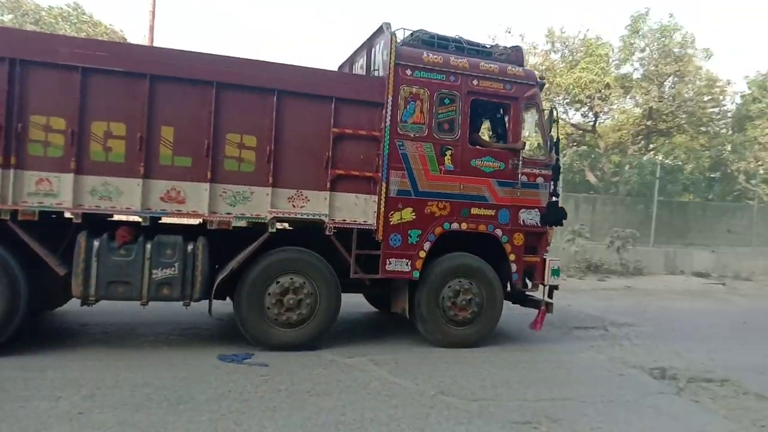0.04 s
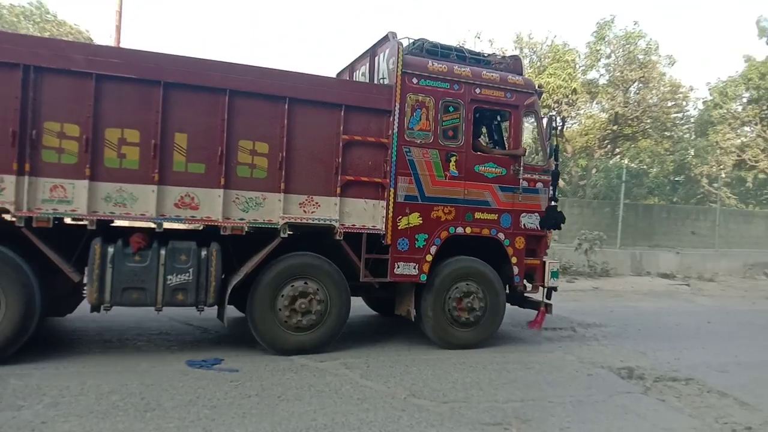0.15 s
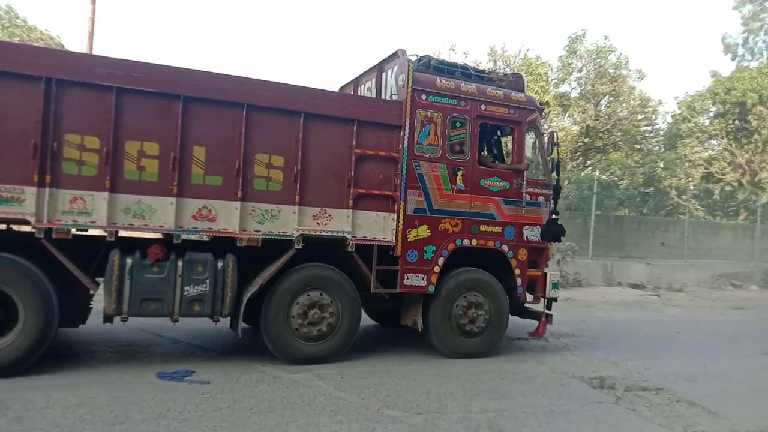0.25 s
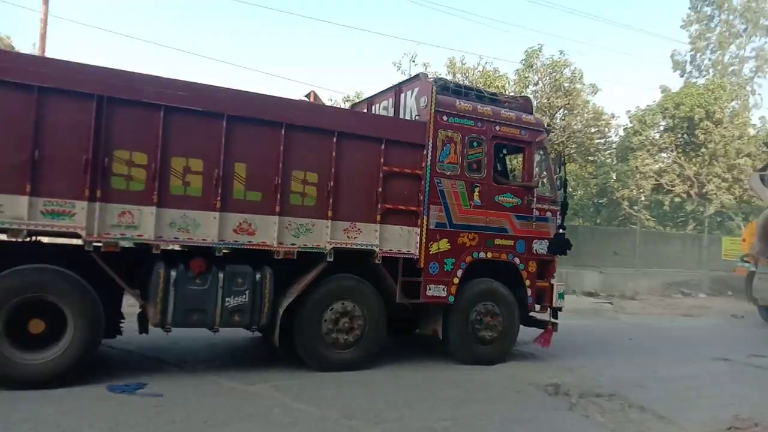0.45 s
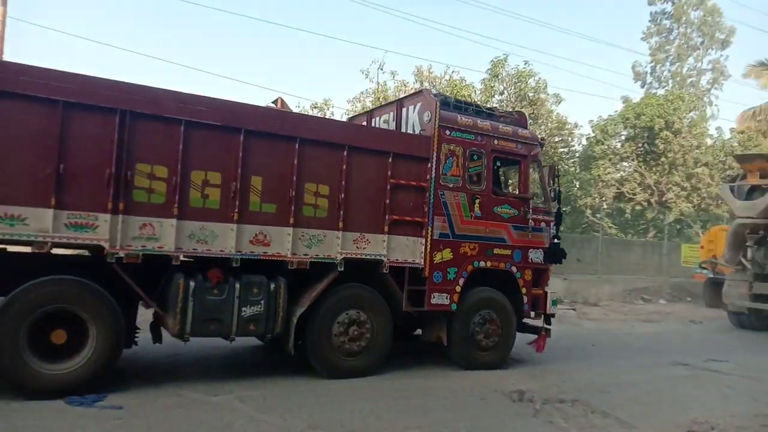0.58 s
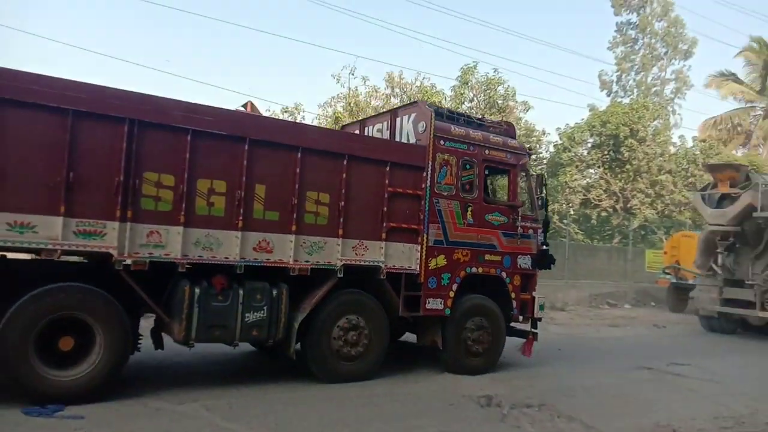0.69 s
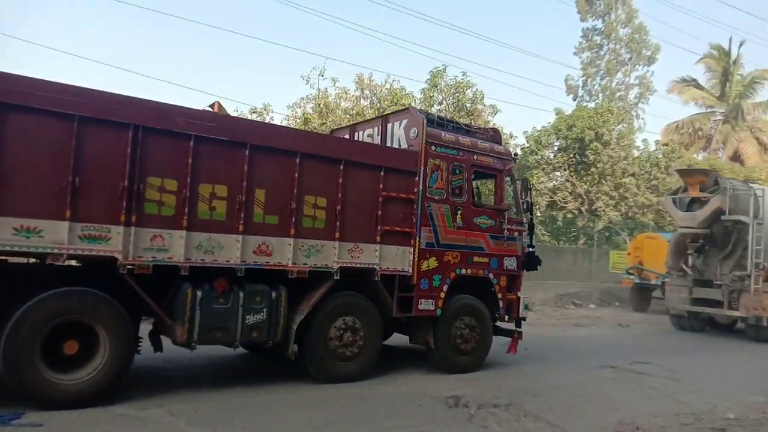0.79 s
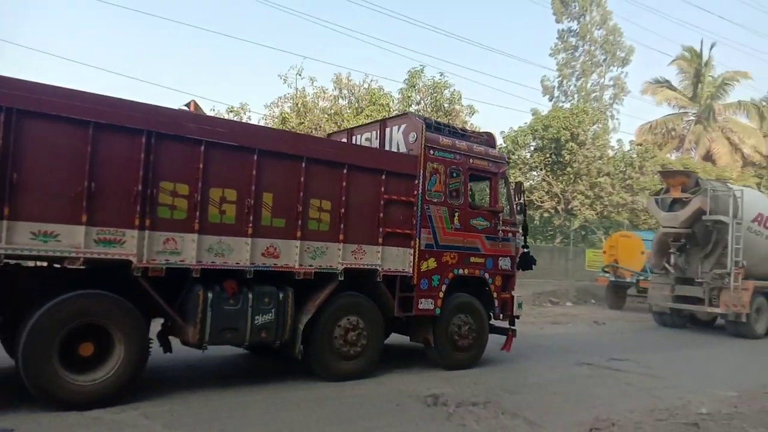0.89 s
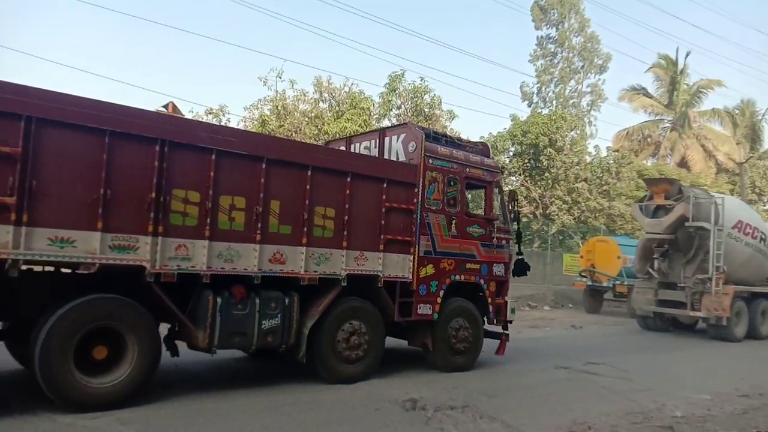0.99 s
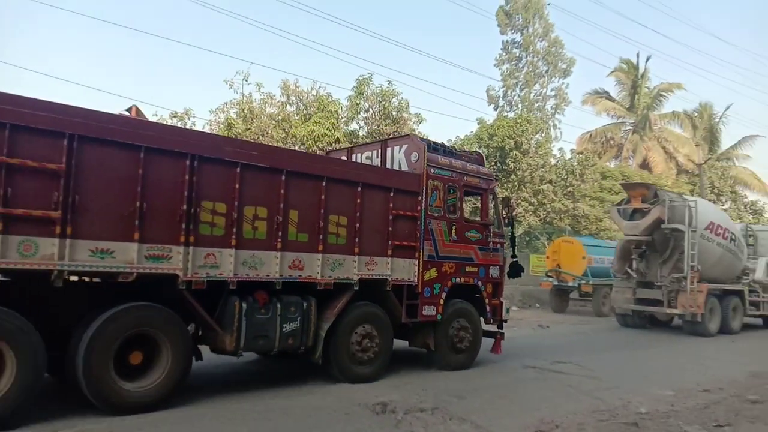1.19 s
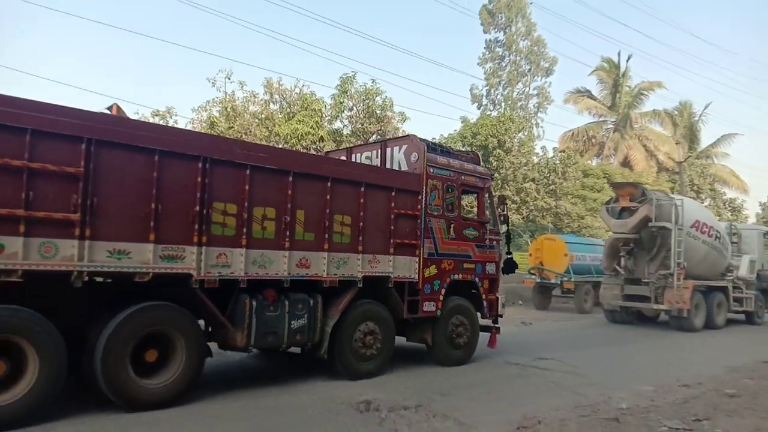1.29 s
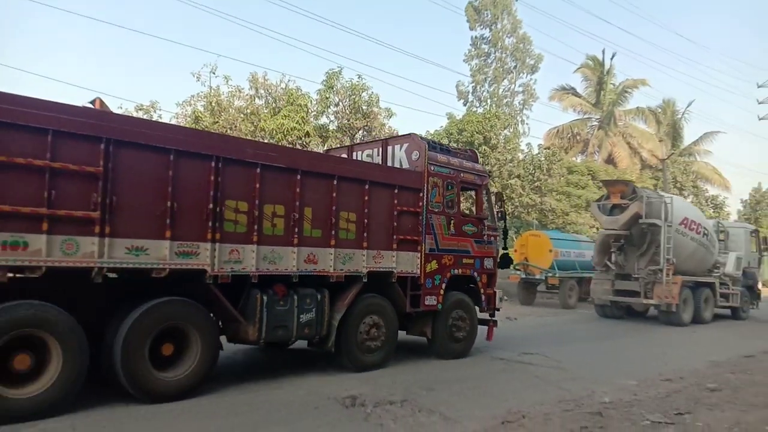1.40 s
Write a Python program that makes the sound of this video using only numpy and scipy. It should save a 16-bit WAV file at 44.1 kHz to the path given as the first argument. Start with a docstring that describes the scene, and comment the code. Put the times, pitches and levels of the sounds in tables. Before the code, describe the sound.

A high truck horn sounds one loud blast over continuous low engine drone and softer tyre noise. First the chassis rattles lightly and gives one thin squeak at about 0.2 seconds. The horn enters near 0.5 seconds with a hiss of air, holds until 0.8, then sags slightly in pitch and dies away by 1.2 with a faint street echo. The truck rolls on until about 1.5 seconds.

```python
"""Horn of a passing truck

A loaded tipper truck rolls past on an open road: broadband engine and tyre noise, and a low drone that
swells around the horn. The chassis rattles lightly in damped metal modes and squeaks once. Then a high
horn sounds one blast, a harmonic series over hissing air, its pitch sagging as it dies away.
The horn's overtones, the squeak and the rattles reverberate in the street."""
import sys
import numpy as np
from scipy import signal
from scipy.fft import rfft, irfft, next_fast_len
from scipy.io import wavfile
from scipy.ndimage import uniform_filter1d, map_coordinates

SR = 44100
rng = np.random.default_rng(int(sys.argv[2]) if len(sys.argv) > 2 else 0)


def wav_record(signal):
    """Record a signal, one row per channel, as 16-bit PCM in the file named by sys.argv[1]."""
    frames = np.transpose(np.atleast_2d(signal))
    bounded = np.clip(frames, -1, 1)
    # unit amplitude maps onto the largest positive 16-bit level
    quanta = np.round(bounded * 32767).astype(np.int16)
    wavfile.write(sys.argv[1], SR, quanta)


N = 63945


def amp(db):
    """Amplitude ratio of a level in decibels."""
    return 10 ** (np.asarray(db) / 20)


def unit(x):
    """Normalisation to rms 1."""
    return x / np.sqrt(np.mean(np.abs(x) ** 2) + 1e-20)


def clock():
    """Sample times in seconds."""
    return np.arange(N) / SR


def curve(rows):
    """Linear interpolation of (t, value) rows at every sample."""
    return np.interp(clock(), *np.transpose(rows))


def gate(start, end, edge):
    """Trapezoidal window: one from start to end, with ramps of edge seconds outside."""
    t = clock()
    return np.clip((t - start) / edge + 1, 0, 1) * np.clip((end - t) / edge + 1, 0, 1)


def wobble(rate):
    """Smooth random modulation: a spline through rate knots a second."""
    return map_coordinates(rng.standard_normal(4096), [clock() * rate + 2], mode="wrap")


def filtered(x, response):
    """Linear filtering: the spectrum of x times a frequency response."""
    size = next_fast_len(N + SR // 2)
    return irfft(rfft(x, size) * response(np.fft.rfftfreq(size, 1 / SR)), size)[:N]


def noise(spectrum):
    """Spectral shaping of white noise by (f, level) rows, at rms 1."""
    f, db = np.transpose(spectrum)
    white = rng.standard_normal(N)
    return unit(filtered(white, lambda hz: amp(np.interp(np.log(hz + 1), np.log(f), db))))


def patchy(x, depth_db=2):
    """Random modulation in time and frequency: drifting patches of higher and lower level."""
    spectra = signal.stft(x, nperseg=512)[2]
    field = uniform_filter1d(rng.standard_normal(spectra.shape), size=3, axis=0)
    field = uniform_filter1d(field, size=10, axis=1)
    return signal.istft(spectra * unit(amp(depth_db * unit(field))), nperseg=512)[1][:N]


def phase_of(hz):
    """Phase in radians as the time integral of frequency."""
    return 2 * np.pi * np.cumsum(hz) / SR


def tone(phase, flutter, rate):
    """Interference of a partial with randomly scattered copies makes it flutter; rms 1."""
    scatter = flutter * (wobble(rate) + 1j * wobble(rate))
    return unit(np.real((1 + scatter) * np.exp(1j * phase)) / np.sqrt(1 + 2 * flutter ** 2))


def street_echo(x, bass_t60_s=0.57):
    """Reverberation: diffuse reflections from walls and vehicles decay, the treble first."""
    hz, t, spectra = signal.stft(rng.standard_normal(SR), SR, nperseg=256)
    t60 = bass_t60_s / (1 + (hz / 7000) ** 2)
    tail = signal.istft(spectra * amp(-60 * t / t60[:, None]), SR, nperseg=256)[1]
    return signal.fftconvolve(x, tail / np.linalg.norm(tail))[:N]


# Spectra of the tyre roar and of its gritty treble: f/Hz, relative level/dB
ROAR_SPECTRUM = [(260, -35), (450, -6.5), (712, -8), (889, -4.5), (1160, -1), (1250, 2.5), (1430, -7.5),
                 (1860, -15.5), (2040, -20.5), (2260, -22.5), (3000, -30), (4030, -36.5), (4740, -37),
                 (6660, -48.5), (15500, -53.5)]
GRIT_SPECTRUM = [(900, -24.5), (1300, 2), (2000, 7.5), (3000, -9.5), (4200, -15.5), (6500, -28.5),
                 (15000, -46)]
# Envelopes of the roar with the tread's sing, and of the grit: t/s, relative level/dB
ROAR_ENVELOPE = [(0.0, -47), (0.44, -48), (1.086, -46.5), (1.126, -53), (1.34, -47), (1.356, -48.5),
                 (1.432, -44.5), (1.45, -46.5)]
GRIT_ENVELOPE = [(0, -48.5), (.08, -56), (.25, -67.5), (.45, -65), (.62, -60.5), (1, -56.5), (1.24, -68.5),
                 (1.34, -53.5), (1.4, -56), (1.425, -42), (1.45, -53)]


def tyres(tread_hz=1238, half_width_hz=64):
    """Rolling noise: a broadband roar, a narrow band where the tread sings, and flickering grit."""
    white = rng.standard_normal(N)
    sing = unit(filtered(white, lambda hz: 1 / (1 + ((hz - tread_hz) / half_width_hz) ** 2)))
    roar = amp(curve(ROAR_ENVELOPE)) * (amp(2.5) * noise(ROAR_SPECTRUM) + amp(-1.5) * sing)
    grit = amp(curve(GRIT_ENVELOPE) + 1.2 * wobble(60)) * noise(GRIT_SPECTRUM)
    return patchy(roar + grit)


# Low drone of the engine: t/s, f/Hz, level/dB
DRONE_TRACK = [(.1, 225.7, -49), (.19, 239.7, -29), (.31, 237.9, -23), (.38, 237.8, -27.5),
               (.54, 240.2, -28), (.68, 238.7, -27.5), (.77, 245.1, -31), (.81, 244, -22),
               (.85, 236.9, -34.5), (1, 235, -29.5), (1.11, 233.5, -42.5), (1.2, 224.3, -37.5)]
# Spectrum of the engine rumble: f/Hz, relative level/dB
RUMBLE_SPECTRUM = [(22, -34), (32, -23.5), (41, -9), (53, -10), (75, 2), (110, 2), (170, 1), (215, 4),
                   (280, -2), (360, -11), (500, -13), (700, -40.5), (1500, -72.5)]
# Envelope of the firing tone: t/s, relative level/dB
FIRING_ENVELOPE = [(0, -38), (.3, -48), (.68, -42.5), (.8, -44.5), (.88, -54), (1.45, -50)]


def engine(firing_hz=42.05, recede_s=0.99, recede_db_per_s=4):
    """Periodic firing gives a deep tone under a wavering drone; the rumble falls as the truck recedes."""
    t = clock()
    times, drone_hz, drone_db = np.transpose(DRONE_TRACK)
    phase = phase_of(np.interp(t, times, drone_hz))
    drone = tone(phase, flutter=0.23, rate=54) + amp(-27) * tone(2 * phase, flutter=0.24, rate=26)
    drone *= amp(np.interp(t, times, drone_db)) * gate(0.212, 1.36, edge=0.084)
    rumble = amp(-33 - recede_db_per_s * np.maximum(t - recede_s, 0)) * noise(RUMBLE_SPECTRUM)
    firing = amp(curve(FIRING_ENVELOPE) - 2.5) * tone(2 * np.pi * firing_hz * t, flutter=0.35, rate=17)
    return drone + firing + rumble


# Whines of the running gear: start t/s, end t/s, f/Hz, level/dB
GEAR_WHINES = [(0, .2, 2733, -58.5), (0, .08, 4150, -67.5), (.2, .27, 2580, -65), (1.385, 1.45, 4114, -65),
               (1.421, 1.453, 1203, -38.5)]


def running_gear():
    """Deep random modulation spreads faint metallic whines into narrow bands of noise."""
    return sum(amp(db) * gate(start, end, edge=0.02) * tone(2 * np.pi * hz * clock(), flutter=4.5, rate=220)
               for start, end, hz, db in GEAR_WHINES)


# Taps of the chassis: t/s, relative level/dB
TAPS = [(.137, -54.5), (.160, -52.5), (.166, -58), (.195, -63.5), (1.325, -65), (1.42, -59)]
# Modes of the loose metal: f/Hz, relative level/dB, T60/s
METAL_MODES = [(2060, -2.5, .06), (2580, 6, .06), (3456, -7.5, .05), (3989, -4.5, 0.11), (7000, -12, .07),
               (9450, -27.5, .05)]
# Spectrum of a tap's crack: f/Hz, relative level/dB
CRACK_SPECTRUM = [(1000, -10), (3200, -1), (4500, -11.5), (6000, -15.5), (15000, -36.5)]


def chassis_rattles(crack_t60_s=0.03, rise_s=0.00033):
    """Impact excitation: each tap gives a short crack and exponentially damped modes of loose metal."""
    out = np.zeros(N)
    for onset, db in TAPS:
        age = np.maximum(clock() - onset, 0)
        ring = sum(amp(level - 60 * age / t60) * np.sin(2 * np.pi * hz * age + rng.uniform(0, 2 * np.pi))
                   for hz, level, t60 in METAL_MODES)
        crack = amp(5.5 - 60 * age / crack_t60_s) * noise(CRACK_SPECTRUM)
        out += amp(db) * (1 - np.exp(-age / rise_s)) * (ring + crack)
    return out


def chassis_squeak(peak_s=0.226, hz=6430, sag_hz_per_s=520, rise_db_per_s=1001, fade_db_per_s=105.5):
    """Exponential growth and decay of a thin, fluttering metal tone that sags a little in pitch."""
    age = clock() - peak_s
    phase = phase_of(hz - sag_hz_per_s * age)
    ring = tone(phase, flutter=0.4, rate=130) + amp(-24.5) * tone(2 * phase, flutter=0.5, rate=200)
    level_db = -47.5 + np.minimum(rise_db_per_s * age, -fade_db_per_s * age)
    return amp(level_db) * ring * gate(0, peak_s + 0.125, edge=0.036)


# Envelope of the horn's air hiss: t/s, level/dB
HISS_ENVELOPE = [(.46, -87), (.51, -66.5), (.58, -61), (.65, -51), (.77, -67.5), (.9, -71), (1.02, -98)]
# Spectrum of the hiss: f/Hz, relative level/dB
HISS_SPECTRUM = [(1000, -25.5), (2500, 0), (3200, -3.5), (4200, -2.5), (4900, -5), (5800, 0), (8500, -18),
                 (12000, -8), (14200, -1.5), (15200, 7.5), (15800, -12.5)]
# Weak side tones of the horn: start t/s, end t/s, start f/Hz, end f/Hz, level/dB
INHARMONIC_TONES = [(.57, .72, 1640, 1598, -55), (.6, .715, 2532, 2500, -44), (.59, .72, 3925, 3905, -68),
                    (.59, .65, 4415, 4405, -64), (.59, .69, 5825, 5795, -63)]


def horn_air():
    """Flow noise of escaping air; at the height of the blast the engine drone modulates the horn into faint
    side tones."""
    out = amp(curve(HISS_ENVELOPE)) * patchy(noise(HISS_SPECTRUM)) * gate(0.39, 1.1, edge=0.03)
    for start, end, start_hz, end_hz, db in INHARMONIC_TONES:
        phase = phase_of(np.interp(clock(), [start, end], [start_hz, end_hz]))
        out += amp(db) * gate(start, end, edge=0.04) * tone(phase, flutter=0.61, rate=64)
    return out


# Fundamental frequency of the horn: t/s, f/Hz
HORN_PITCH = [(0.48, 1372), (0.616, 1387), (0.832, 1376), (0.952, 1357), (1.04, 1363)]
# Envelopes of the fundamental and of its octave: t/s, level/dB
FUNDAMENTAL_ENVELOPE = [(0.43, -59), (0.476, -28.5), (0.5, -21), (0.546, -14.5), (0.576, -21), (0.61, -14),
                        (0.64, -22), (0.662, -16), (0.776, -15), (0.976, -32.5), (1.038, -31.5),
                        (1.06, -54), (1.084, -35), (1.116, -45), (1.174, -43), (1.206, -56), (1.22, -52)]
OCTAVE_ENVELOPE = [(0.45, -90.5), (0.468, -48), (0.514, -28), (0.546, -43.5), (0.57, -23), (0.584, -22),
                   (0.624, -39), (0.654, -21), (0.678, -50), (0.706, -26), (0.738, -37), (0.79, -24.5),
                   (0.854, -36.5), (0.89, -28.5), (0.946, -33.5), (0.976, -42), (1.138, -60), (1.156, -53),
                   (1.22, -68)]
# Brassy overtones at full blast: harmonic number, level/dB
UPPER_HARMONICS = [(3, -49), (4, -51), (5, -63.5), (6, -70.5), (7, -67.5), (8, -70), (9, -75), (10, -71),
                   (11, -51.5)]


def horn(jitter_hz=4.5, onset_s=0.473, attack_s=0.029, release_s=0.87):
    """Harmonic series in two parts: the lowest two partials, and overtones that fade faster with order."""
    t = clock()
    phase = phase_of(curve(HORN_PITCH) + jitter_hz * wobble(150))
    envelopes = [curve(FUNDAMENTAL_ENVELOPE), curve(OCTAVE_ENVELOPE)]
    fundamental_db, octave_db = uniform_filter1d(envelopes, round(0.012 * SR))
    fading_s = np.maximum(t - release_s, 0)
    diffuse = 0.72 * np.clip(fading_s / 0.12, 0, 1)  # the dying tone flutters more
    fundamental = amp(fundamental_db) * tone(phase, flutter=amp(-29) + diffuse, rate=70)
    octave = amp(octave_db) * tone(2 * phase, flutter=0.24 + diffuse, rate=110)
    core = (fundamental + octave) * gate(0.45, 1.23, edge=0.04)
    brass = np.zeros(N)
    for k, db in UPPER_HARMONICS:
        fade_db_per_s = 75 + 15 * k
        brass += amp(db - fade_db_per_s * fading_s) * tone(k * phase, flutter=0.7, rate=45 + 24 * k)
    attack = np.clip((t - onset_s) / attack_s, 0, 1) ** 2
    return core, attack * brass


def scene():
    """Superposition of the horn, the passing truck and the echo of the bright sounds."""
    core, brass = horn()
    squeak, rattles = chassis_squeak(), chassis_rattles()
    echo = amp(-9.5) * street_echo(brass + amp(-10.5) * squeak + amp(-3.5) * rattles)
    return (core + brass + horn_air() + squeak + rattles + running_gear() + echo + engine() + tyres())[None]


def record(dry, cutoff_hz=15700):
    """Band limiting: the microphone acts as an ideal low-pass filter."""
    return filtered(dry[0], lambda hz: hz < cutoff_hz)[None]


dry = scene()
out = record(dry)
wav_record(out)
```